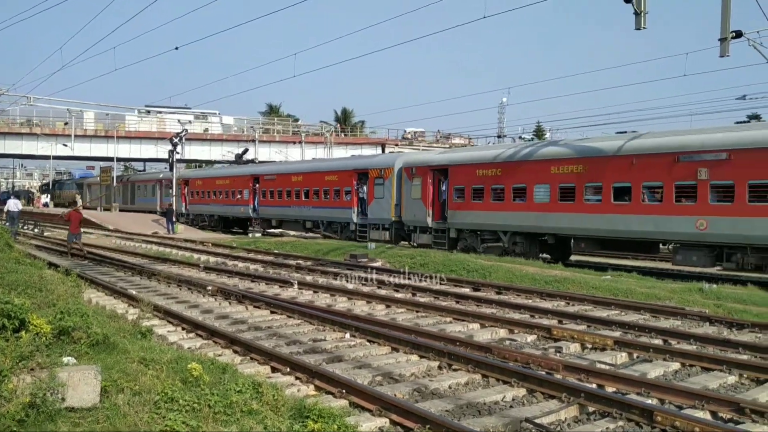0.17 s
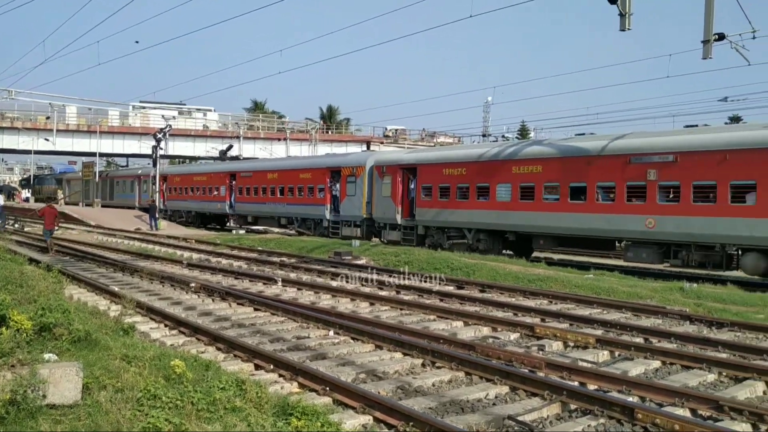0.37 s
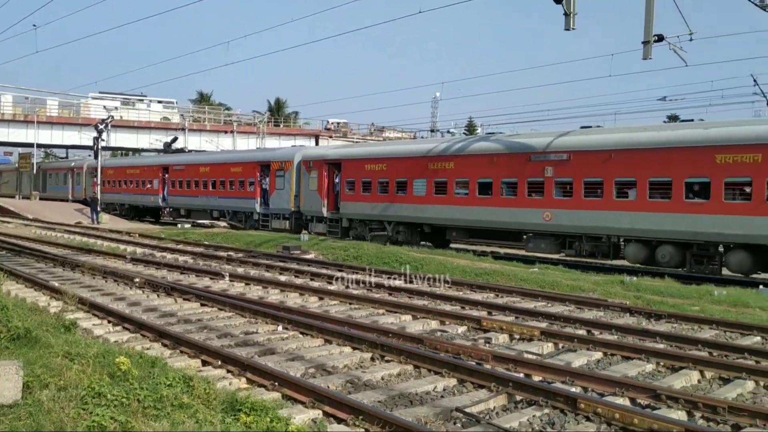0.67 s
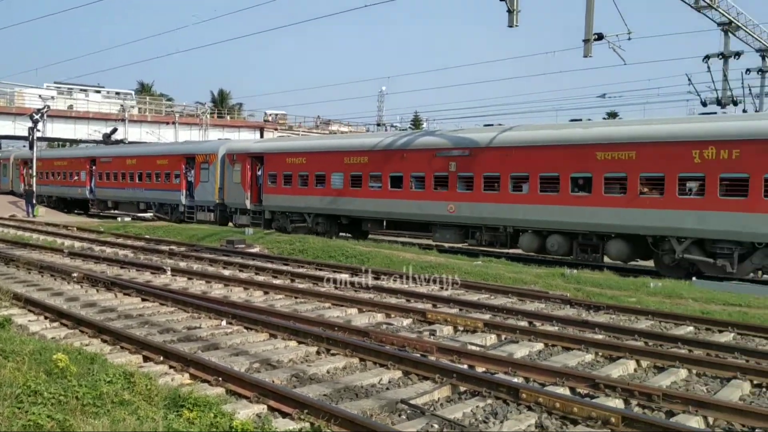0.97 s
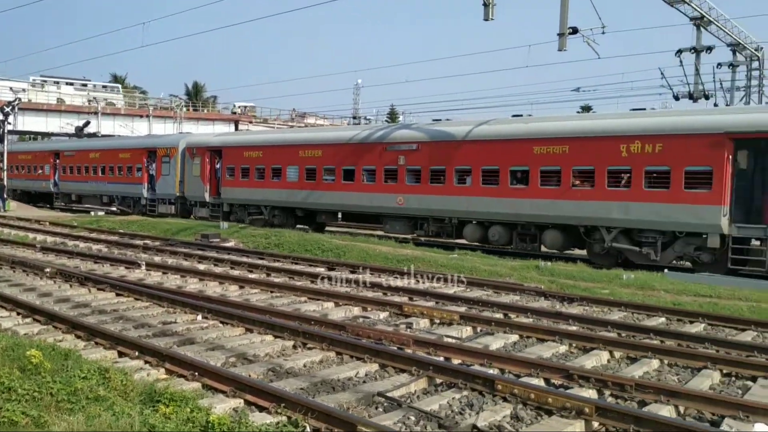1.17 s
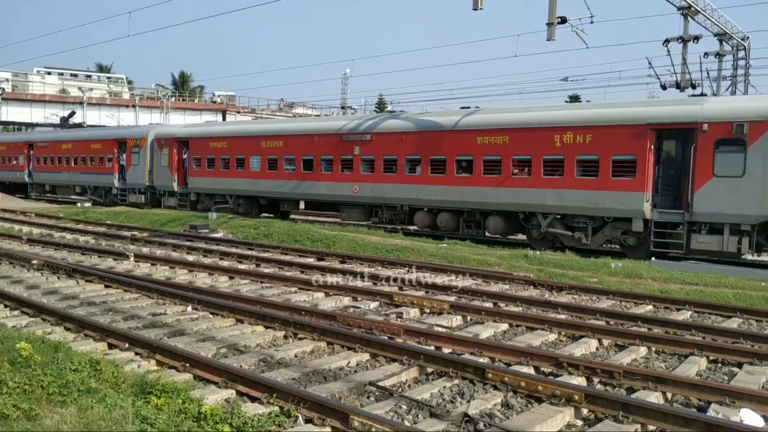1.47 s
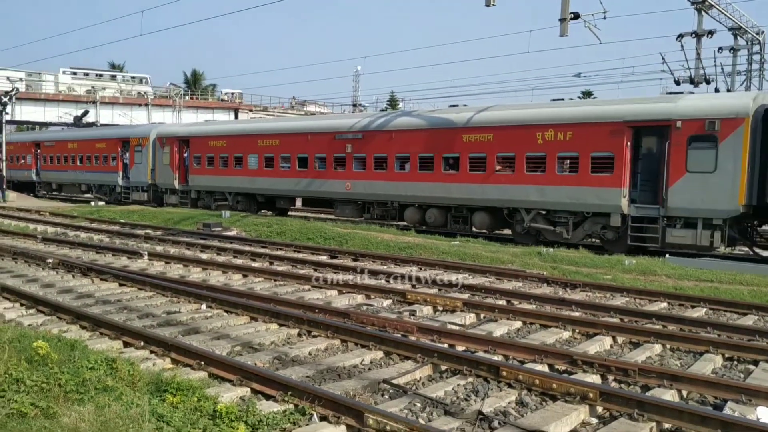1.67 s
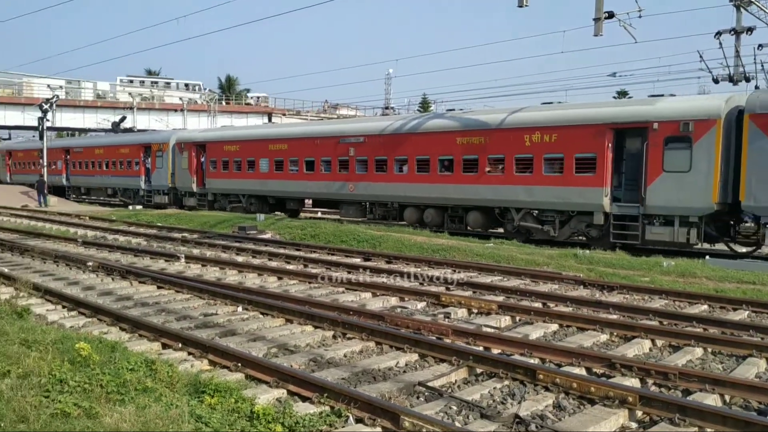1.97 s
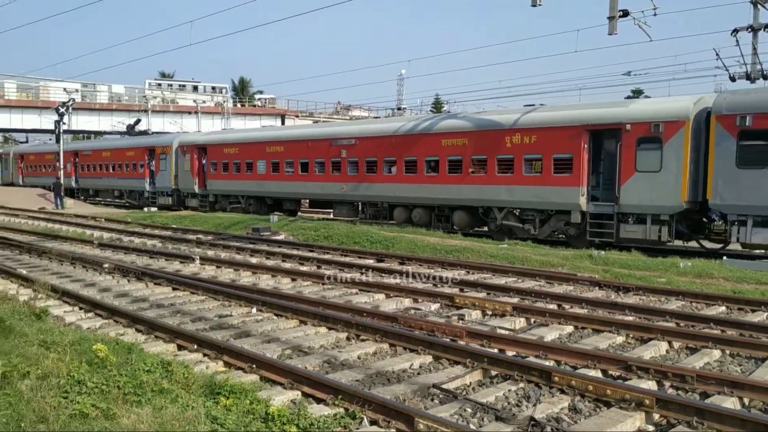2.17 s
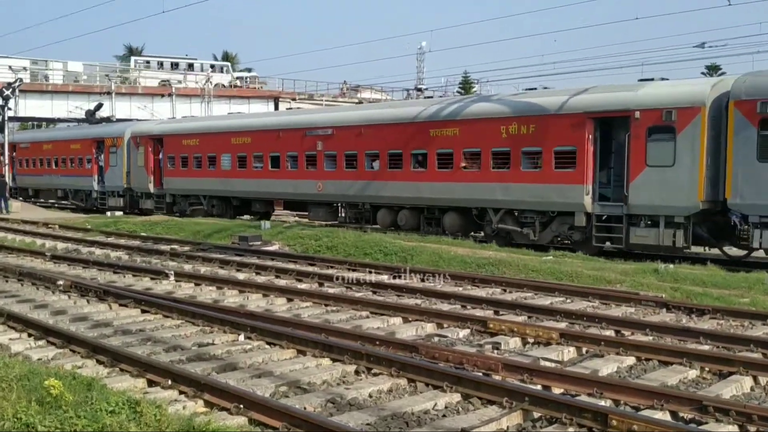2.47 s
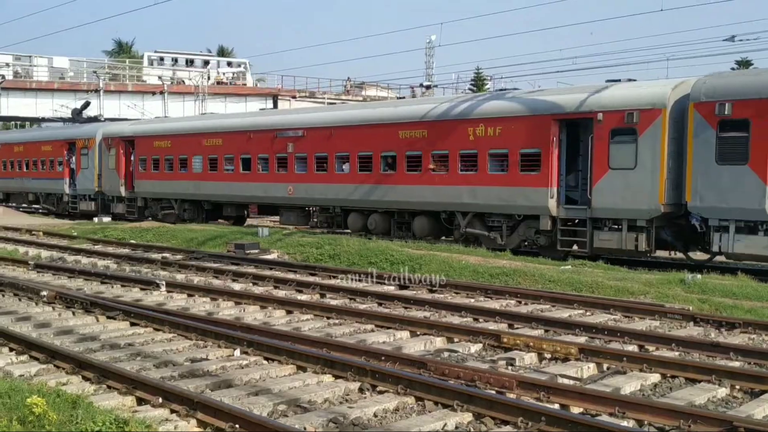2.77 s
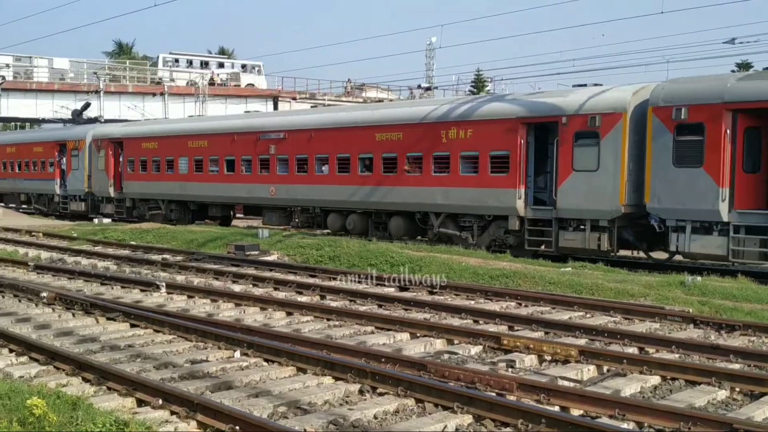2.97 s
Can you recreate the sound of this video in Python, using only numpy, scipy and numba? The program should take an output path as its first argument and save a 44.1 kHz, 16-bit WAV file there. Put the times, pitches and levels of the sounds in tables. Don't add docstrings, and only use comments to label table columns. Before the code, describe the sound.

A passenger train rolls slowly past with heavy bass engine drone, wheel roar and a rising thin squeal

```python
import sys
import numpy as np
from scipy import signal
from scipy.io import wavfile
from scipy.ndimage import uniform_filter1d, map_coordinates
from numba import njit

SR = 44100
rng = np.random.default_rng(int(sys.argv[2]) if len(sys.argv) > 2 else 0)


def volts_from_decibels(level):
    exponent = np.asarray(level, float) / 20
    return 10 ** exponent


def inscribe(sig):
    pcm = np.round(np.clip(np.atleast_2d(sig).T, -1, 1) * 32767)
    wavfile.write(sys.argv[1], SR, pcm.astype(np.int16))


N = 137592
TIME_S = np.arange(N) / SR


def set_rms(x, db):
    return x * volts_from_decibels(db) / np.sqrt(np.mean(x ** 2))


@njit
def bandpass(x, hz, width_hz):
    y, band, low = np.empty(len(x)), 0., 0.
    g, damping = np.tan(np.pi * hz / SR), width_hz / hz
    for i in range(len(x)):
        v = (band + g * (x[i] - low)) / (1 + g * (g + damping))
        band, low, y[i] = 2 * v - band, low + 2 * g * v, damping * v
    return y


def noise_band(noise, hz, width_1_hz, width_2_hz):
    return bandpass(bandpass(noise, hz, width_1_hz), hz, width_2_hz)


def walk(rate_hz):
    hold = int(SR / rate_hz)
    steps = np.repeat(rng.standard_normal(N // hold + 1), hold)
    return 1.37 * uniform_filter1d(uniform_filter1d(steps, hold), hold)[:N]


def in_time(table, column=1):
    table = np.array(table)
    return np.interp(TIME_S, table[:, 0], table[:, column])


def at_hz(table, hz, column=1):
    table = np.array(table)
    return np.interp(np.log(hz), np.log(table[:, 0]), table[:, column])


def tone(hz):
    return np.cos(2 * np.pi * np.cumsum(hz) / SR)


# time in seconds, roar level in dB, how far the left port faces the wheels 0-1.
PASSING = [(0, -0.5, 0.08), (.45, 1.46, 0.29), (1.0, 0.5, 0.33), (1.38, 0, 0.35), (1.52, 0, 0.62),
           (2.2, 0.5, 0.86), (2.75, 1, 0.79), (3.12, 1.5, 0.72)]
# frequency in Hz, gain turned away in dB, gain facing the wheels in dB.
LEFT_PORT = [(152, 2.43, 1.35), (900, -4, 3), (1460, -5.5, -1), (2050, -2.5, 7.5), (2640, 6, 7.5),
             (4900, -10, 9.5), (8200, -18, -4), (14000, -26, -7)]


def ports(direct, hz, diffuse=0):
    facing = in_time(PASSING, column=2)
    away_db, facing_db = at_hz(LEFT_PORT, hz), at_hz(LEFT_PORT, hz, column=2)
    lag_s = 0.0003 + (0.0005 - 0.0003) * np.clip(facing, 0, 1)
    left = map_coordinates(direct, [np.arange(N) - lag_s * SR], order=2, mode="mirror")
    left_gain = volts_from_decibels(away_db + (facing_db - away_db) * facing)
    return (np.array([left, direct]) + diffuse) * np.array([left_gain, np.ones(N)])


# start in seconds, peak in dB, centre in Hz.
TICKS = [
    (.152, -19, 800),
    (.73, -17, 800),
    (.934, -13, 800),
    (1.112, -14, 600),
    (1.432, -19, 1300),
    (1.51, -14, 600),
    (2.06, -18, 900),
]


def ticks():
    out, right_db = 0, -12
    for start_s, peak_db, hz in TICKS:
        blow = np.zeros(N)
        blow[int(start_s * SR)] = 1
        tick = noise_band(blow, hz, 1.3 * hz, 1.3 * hz)
        out = out + tick * volts_from_decibels(peak_db) / abs(tick).max()
    return out * volts_from_decibels([[0], [right_db]])


# centre in seconds, length in seconds, level in dB, centre in Hz, left minus right in dB.
SPITS = [
    (0.422, 0.074, -34.5, 7000, -3),
    (0.771, 0.036, -31.5, 9600, 3.5),
    (0.943, 0.46, -46, 11600, -2),
    (1.25, 0.44, -51.5, 10900, -11),
    (1.504, 0.059, -45, 9000, 8),
    (1.636, 0.027, -35, 12500, 7),
    (1.7, .08, -44, 10000, 14),
    (2.403, 0.12, -40, 12800, 8),
    (2.542, 0.18, -39.5, 6000, -9),
    (3.045, 0.1, -42, 12300, 13),
]


def spits():
    out = 0
    for centre_s, length_s, db, hz, pan_db in SPITS:
        hiss = set_rms(noise_band(rng.standard_normal(N), hz, 0.83 * hz, 1.1 * hz), db)
        puff = hiss * np.exp(-2 * ((TIME_S - centre_s) / (length_s / 2)) ** 2)
        out = out + ports(puff, hz) * volts_from_decibels([[pan_db / 2], [-pan_db / 2]])
    return out


def squeak():
    start_s, start_hz, rise_hz_per_s, level_db, t60_s = 2.493, 3880, 15000, -35, 0.2
    age_s = np.maximum(TIME_S - start_s, 0)
    hz = start_hz + rise_hz_per_s * np.minimum(age_s, 0.025) + 40 * walk(90)
    rise = 1 - np.exp(-age_s / 0.003)
    decay = volts_from_decibels(level_db - 60 * age_s / t60_s + 3.0 * walk(67.6))
    return ports(rise * decay * tone(hz), start_hz)


# start in seconds, level in dB, ring in Hz.
CLUNKS = [
    (0.128, -33, 1730),
    (0.219, -25, 795),
    (.44, -27.5, 1630),
    (1.503, -26, 880),
    (1.695, -25, 1560),
    (2.049, -26, 1760),
    (2.639, -23, 606),
    (2.957, -28.5, 2020),
    (3.095, -33.5, 2310),
]


def clunks():
    knock_t60_s, ring_t60_s, ring_db = 0.13, 0.45, -14
    out = 0
    for start_s, db, hz in CLUNKS:
        age_s = np.maximum(TIME_S - start_s, 0)
        rise, noise = 1 - np.exp(-age_s / 0.00067), rng.standard_normal(N)
        knock = set_rms(noise_band(noise, hz, 0.94 * hz, 1.6 * hz), db) * volts_from_decibels(-60 * age_s / knock_t60_s)
        ring = set_rms(bandpass(noise, hz, 120.0), db + ring_db) * volts_from_decibels(-60 * age_s / ring_t60_s)
        out = out + ports(rise * (knock + ring), hz)
    return out


# time in seconds, level in dB, pitch drift in Hz.
SQUEAL = [(0, -45, -10), (.3, -45, -10), (.47, -40, -10), (.58, -46, 0), (1.05, -42, 10), (1.25, -46, 20),
          (2.05, -48, 35), (2.3, -42, 20), (2.45, -46, 10), (2.6, -36, 0), (2.85, -33, 0),
          (3.04, -29.5, -5), (3.12, -31, 0)]
# pitch in Hz, tremble in Hz, early level in dB, late level in dB.
SQUEAL_MODES = [(5078, 14, -3, 0), (5112, 25, -5, -11), (5170, 22, -4, -12), (5030, 25, -9, -10)]


def squeal():
    takeover_s = 2.53
    late = 1 / (1 + np.exp(-(TIME_S - takeover_s) / 0.042))
    drift_hz, modes = in_time(SQUEAL, column=2), 0
    for hz, tremble_hz, early_db, late_db in SQUEAL_MODES:
        beads_db = (5.5 - 2.0 * late) * walk(80)
        gain = volts_from_decibels(early_db + (late_db - early_db) * late + beads_db)
        modes = modes + gain * tone(hz + drift_hz + tremble_hz * walk(60))
    near = modes * volts_from_decibels(in_time(SQUEAL))
    scattered = volts_from_decibels(-11) * np.array([np.roll(near, lag) for lag in rng.integers(900, 3000, size=2)])
    return ports(near, 4670.0, scattered)


# frequency in Hz, level in dB per Hz.
ROLL = [(30, -2.5), (130, 1.5), (250, -6), (500, -12.5), (1100, -13.5), (2600, -24.5), (6000, -29),
        (14000, -36.5)]
# frequency in Hz, direct share 0-1.
DIRECT = [(40, 0.86), (300, 0.8), (1000, 0.32), (5000, 0), (12000, 0.4)]
# centre in Hz, width in Hz, level in dB, change in dB per second.
WHEEL_RINGS = [(215.3, 12.8, -35, -0.7), (245.2, 23, -35, -1), (329.3, 27, -37.5, -0.5),
               (636, 116, -40, 4.5), (820, 146, -41, -4.5), (1676, 89, -46, -7), (2430, 266, -44.5, 1.4),
               (2785, 78, -48, 4.5), (3610, 500, -52, 10.5)]


def roar():
    bands, swell, shimmer = 0, walk(3.15), walk(60)
    for hz in 25 * 2 ** (np.arange(28) / 3):
        direct, left, right = (noise_band(rng.standard_normal(N), hz, hz / 3, hz / 2) for _ in range(3))
        share = np.clip(at_hz(DIRECT, hz), 0, 1)
        db = at_hz(ROLL, hz) + 0.3 * swell + 0.7 * shimmer * min(hz / 9500.0, 1) + 1.4 * walk(14)
        diffuse = np.sqrt(1 - share) * np.array([left, right])
        bands = bands + volts_from_decibels(db) * ports(np.sqrt(share) * direct, hz, diffuse)
    rings = 0
    for hz, width_hz, db, change_db_per_s in WHEEL_RINGS:
        ring = set_rms(bandpass(rng.standard_normal(N), hz, width_hz), db)
        gain = volts_from_decibels(1.3 * walk(12) + change_db_per_s * (TIME_S - 2.0))
        rings = rings + gain * ports(ring, hz)
    return (set_rms(bands, -23) + rings) * volts_from_decibels(in_time(PASSING))


def hand_shade(pair):
    hz, width_hz, max_depth = 1400, 350, 0.6
    depth = max_depth * (1 - np.clip(in_time(PASSING, column=2), 0, 1) ** 2)
    return np.array([pair[0] - depth * bandpass(pair[0], hz, width_hz), pair[1]])


def drone(shaft_hz, multiples, levels_db, curve, wander, flutter_db):
    turns = np.cumsum(shaft_hz * (1 + wander * walk(2.91))) / SR
    tones = 0
    for k, db in zip(multiples, levels_db):
        gain = volts_from_decibels(db + flutter_db * walk(5.82))
        tones = tones + gain * np.cos(2 * np.pi * (k * turns + rng.random()))
    return ports(np.sqrt(2) * volts_from_decibels(in_time(curve)) * tones, 80.)


# time in seconds, level in dB.
TRACTION = [(0, -19.5), (0.299, -16), (1.0, -14.5), (1.6, -19), (2.1, -20.5), (2.6, -20), (3.12, -22)]
TRACTION_DB = [-16, -6.5, -6, -13, -5, -6, -3, -17, -12]


def traction_diesel():
    cycle_hz, multiples = 5.775, (4, 8, 9, 11, 15, 16, 17, 18, 19)
    return drone(cycle_hz, multiples, TRACTION_DB, TRACTION, wander=0.00072, flutter_db=2.4)


# time in seconds, level in dB.
GENERATOR = [(0.0, -7.5), (0.07, -5.5), (1.69, -12.5), (1.84, -21), (1.95, -13), (2.21, -12.5), (2.42, -17),
             (2.48, -54), (2.63, -17.5), (2.81, -10.5), (3.03, -13.5), (3.12, -21.5)]
# time in seconds, level in dB.
OVERTONES = [(0, -35), (.35, -40), (.55, -31), (1.15, -37), (1.4, -32), (1.6, -33), (1.95, -27),
             (2.15, -32), (2.65, -26), (2.9, -34), (3.12, -28)]
OVERTONE_DB = [0, -9]


def generator_diesel():
    firing_hz = 74.1
    firing = drone(firing_hz, [1], [0], GENERATOR, wander=0.0004, flutter_db=0.12)
    overtones = drone(firing_hz, (2, 3), OVERTONE_DB, OVERTONES, wander=0.006, flutter_db=1.5)
    return firing + overtones


def scene():
    brakes = spits() + squeak()
    rolling = ticks() + clunks() + squeal() + hand_shade(roar())
    engines = volts_from_decibels(-0.22) * (traction_diesel() + generator_diesel())
    return brakes + rolling + engines


# frequency in Hz, threshold in dB per Hz.
AUDIBLE = [(4500, -102), (6000, -81), (9000, -91.5), (12000, -91.5), (13500, -86), (14500, -86),
           (15300, -84), (16000, -70)]


def drop_faint(x):
    block, patch, scatter_db = 2048, 8, 4
    hz, _, z = signal.stft(x, SR, nperseg=block, scaling="psd")
    power = abs(z) ** 2
    smooth = uniform_filter1d(uniform_filter1d(power, size=2 * patch, axis=1), size=2, axis=2)
    scatter = rng.standard_normal((2, len(hz) // patch + 1, z.shape[2]))
    scatter = 2 * uniform_filter1d(scatter, size=4, axis=2)
    scatter = np.repeat(scatter, patch, axis=1)[:, :len(hz)]
    floor = volts_from_decibels(at_hz(AUDIBLE, hz + 1)[:, None] + scatter_db * scatter) ** 2
    kept = z * (smooth > floor) * (power > 0.6 * floor)
    return signal.istft(kept, SR, nperseg=block, scaling="psd")[1][:, :N]


def band_limit(x):
    return signal.sosfilt(signal.butter(12, 15320, fs=SR, output="sos"), x)


def record(dry):
    converted = np.clip(dry, -1, 1)
    mix = np.clip(drop_faint(converted), -1, 1)
    return band_limit(mix)


dry = scene()
out = record(dry)
inscribe(out)
```